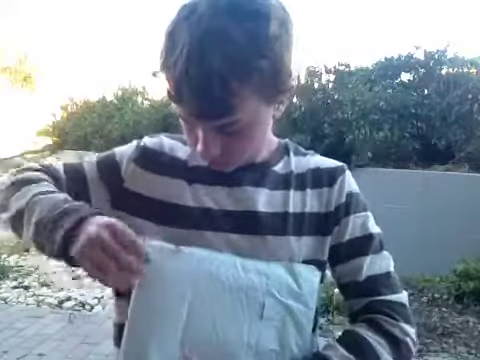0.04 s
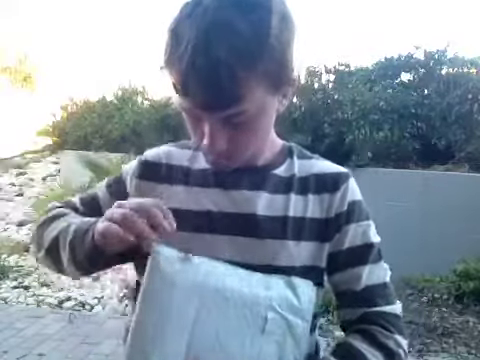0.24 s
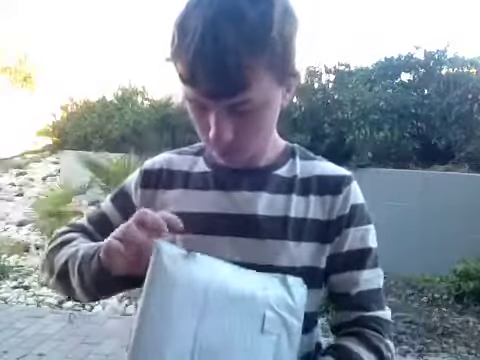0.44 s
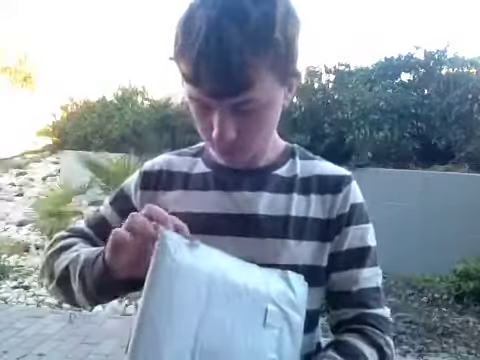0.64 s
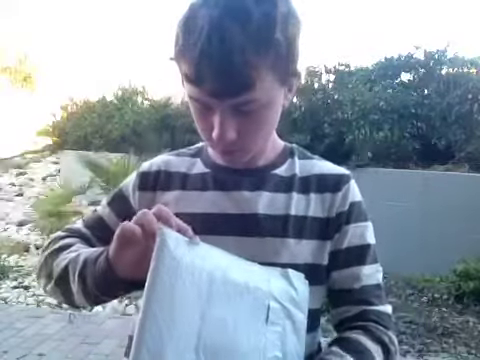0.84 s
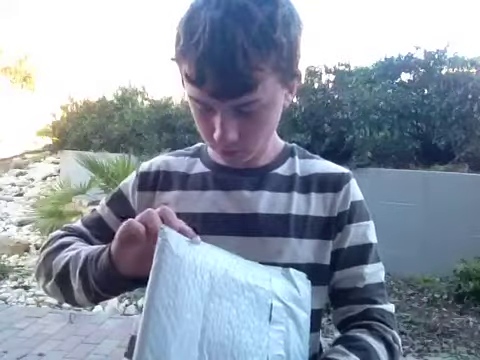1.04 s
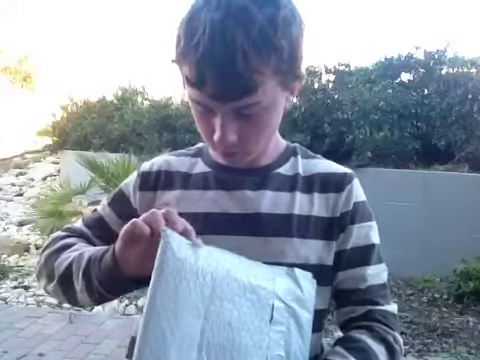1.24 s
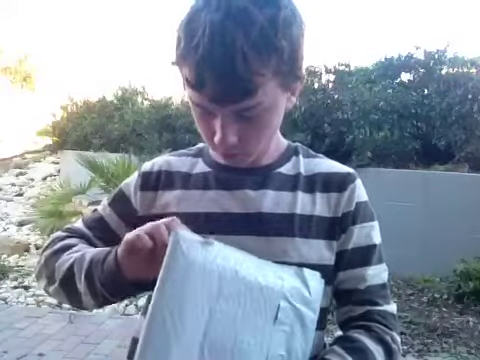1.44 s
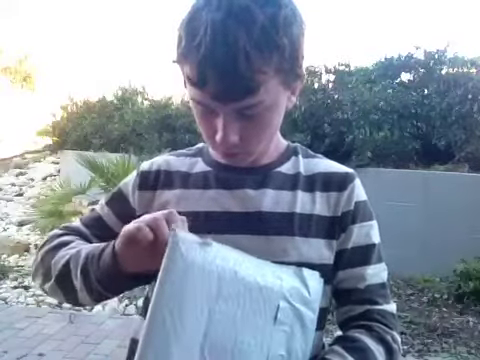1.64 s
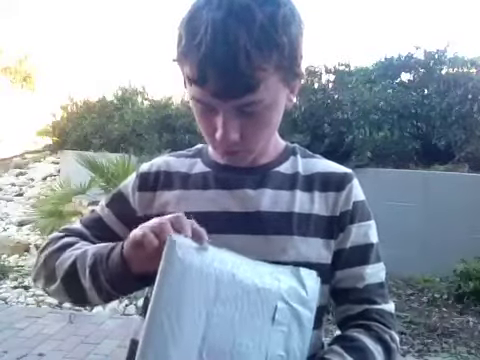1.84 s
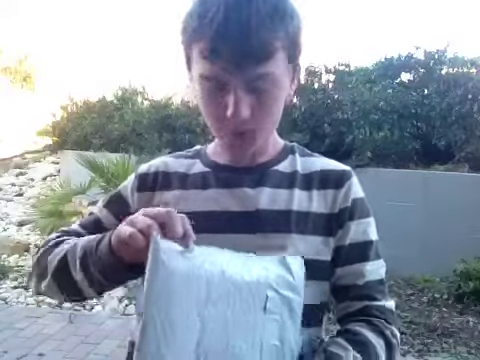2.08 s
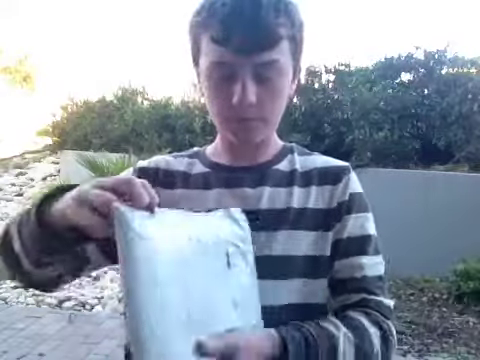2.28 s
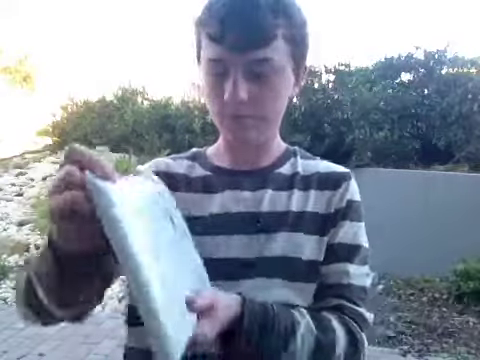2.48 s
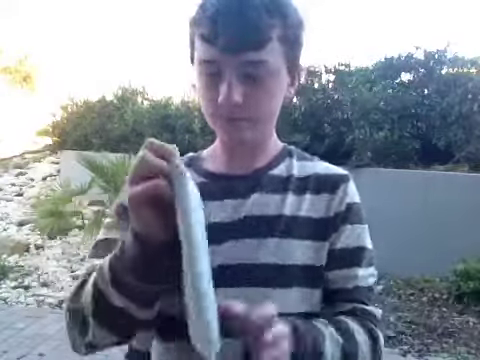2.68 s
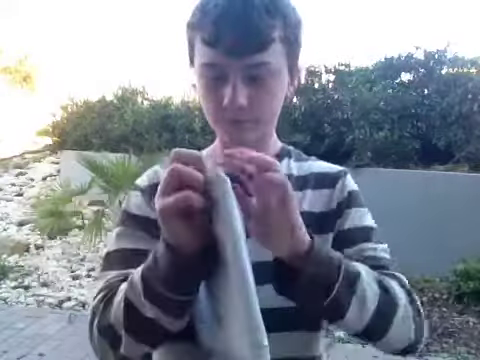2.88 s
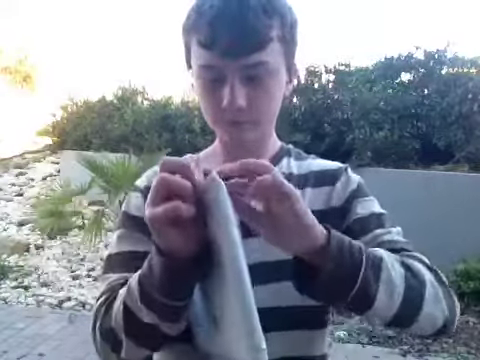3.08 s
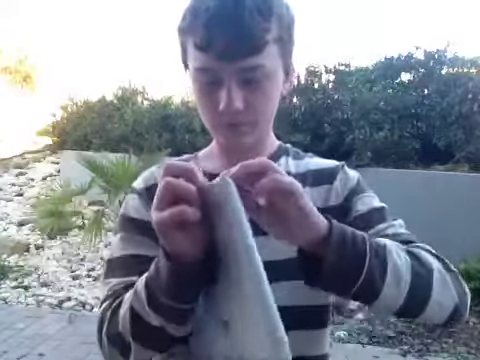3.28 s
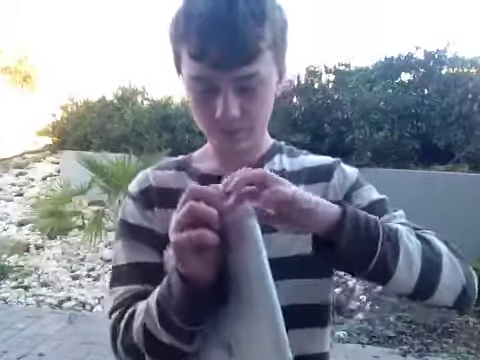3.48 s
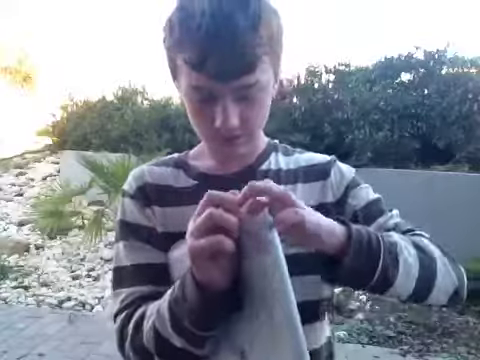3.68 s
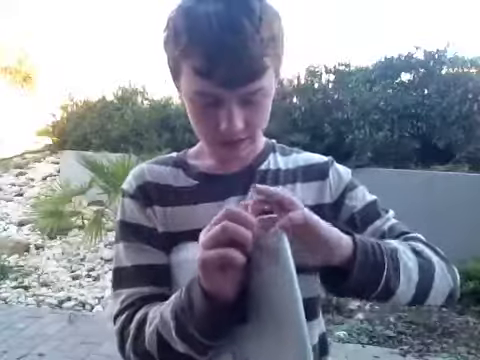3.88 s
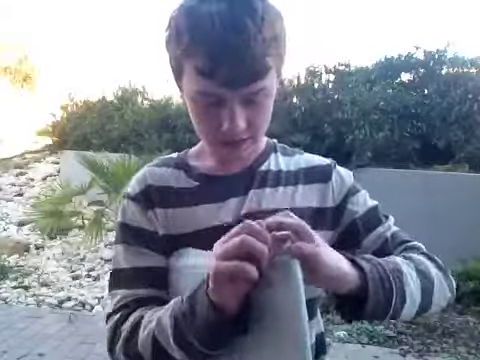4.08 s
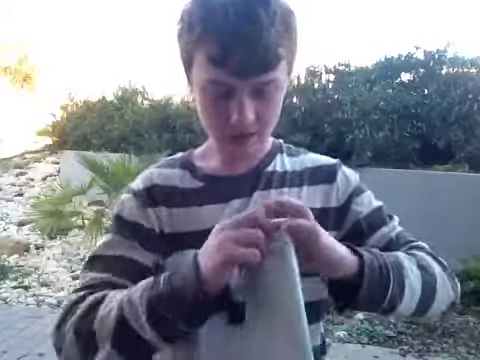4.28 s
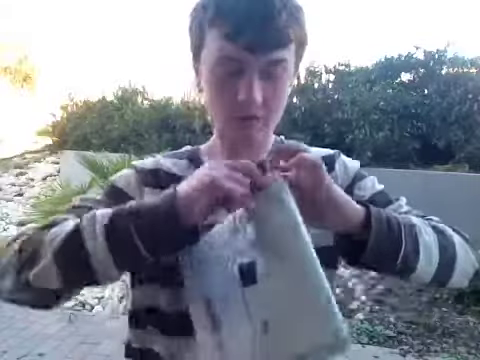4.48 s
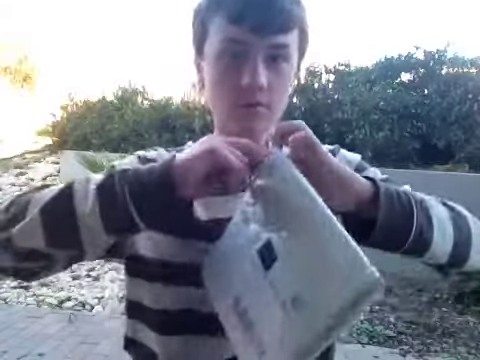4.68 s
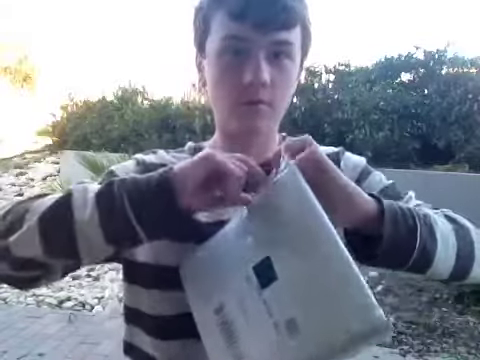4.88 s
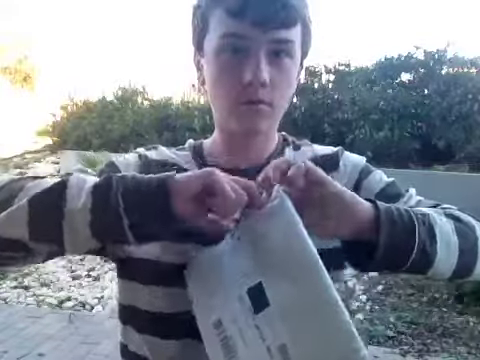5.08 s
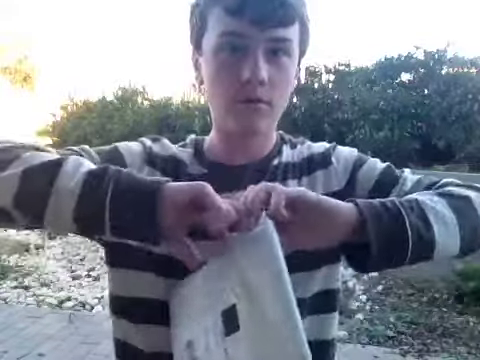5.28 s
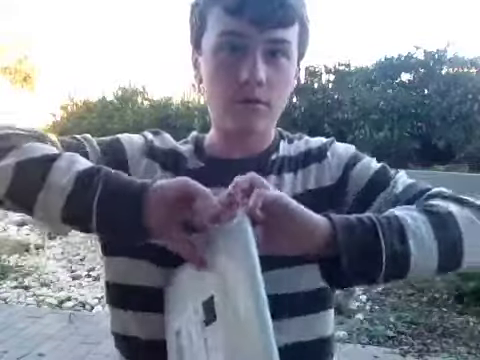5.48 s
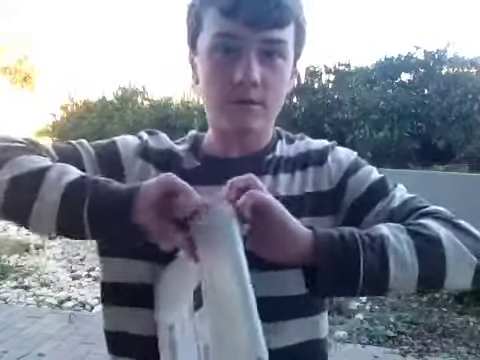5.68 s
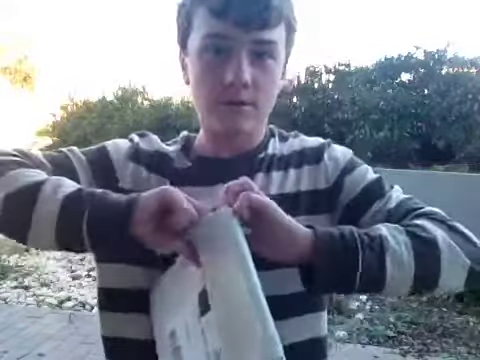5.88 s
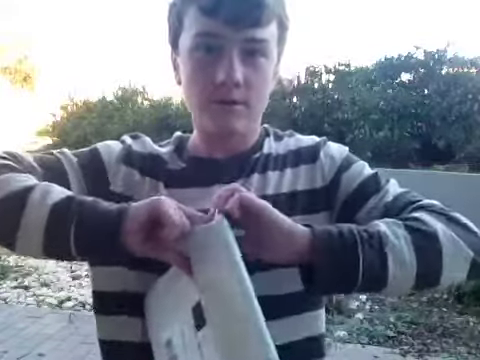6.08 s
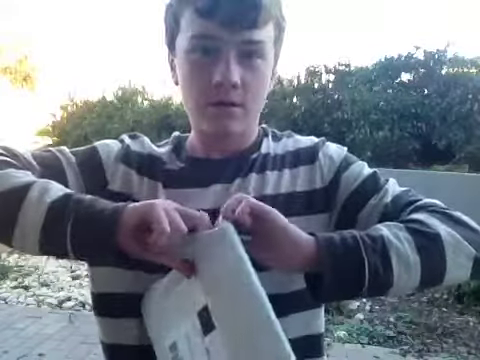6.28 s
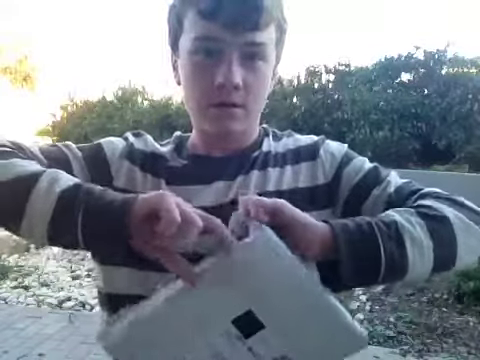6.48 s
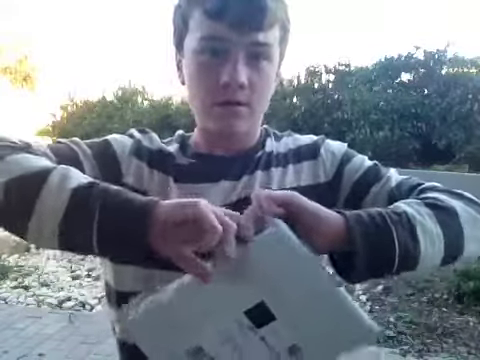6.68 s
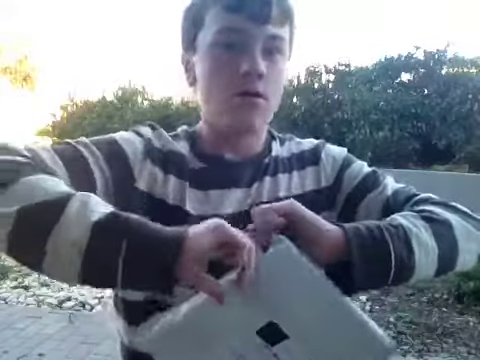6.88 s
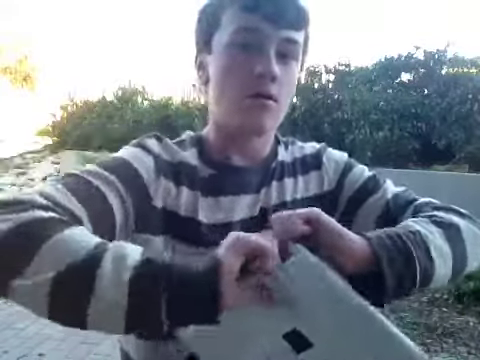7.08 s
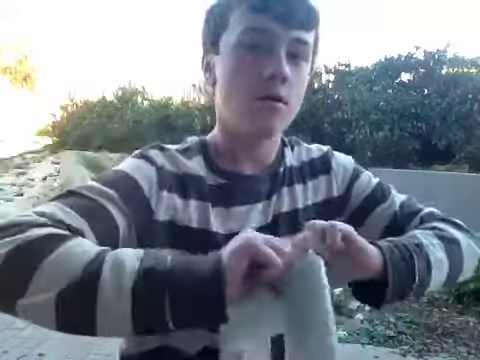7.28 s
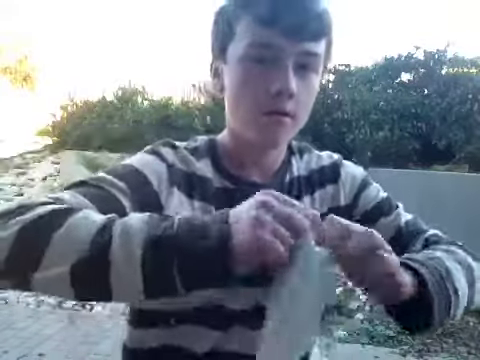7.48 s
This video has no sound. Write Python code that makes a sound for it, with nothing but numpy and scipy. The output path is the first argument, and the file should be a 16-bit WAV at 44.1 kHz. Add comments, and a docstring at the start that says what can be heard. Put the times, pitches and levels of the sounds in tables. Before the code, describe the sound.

Stiff padded envelope crackles and rips in short tugs, with a few sharp pops and dull thumps, in a quiet yard.

```python
"""Paper rustles, crackles and tears in short tugs, with hollow knocks, in a quiet yard with a faint hum and hiss.
Hands pick at a padded paper mailer, turn it over and tear its sealed edge open.
Slipping fibres and folding creases are clumped grains over coloured noise; sharp snaps are kicks with noise tails.
Damped modes sound the padded body, and short decaying noise answers from paving and a garden wall."""
import sys
import numpy as np
from scipy import signal
from scipy.fft import rfft, irfft, next_fast_len
from scipy.io import wavfile
from scipy.ndimage import map_coordinates

SR = 44100
rng = np.random.default_rng(int(sys.argv[2]) if len(sys.argv) > 2 else 0)


def store_wav(level_fs):
    """Save 16-bit WAV to argv[1]."""
    pcm = np.round(np.clip(np.atleast_2d(level_fs), -1, 1) * 32767)
    wavfile.write(sys.argv[1], SR, pcm.T.astype(np.int16))


N = 332514

# relative spectrum of the flexing sheet: frequency_hz, density_db
SHEET_SPECTRUM = [(80, -41), (250, -8.5), (400, -4.5), (800, -7), (1600, 0.5), (2700, 3.5), (4200, 5.5),
                  (7000, -42), (14000, -52)]


def amp(db):
    """Decibel law: amplitude ratio of a level in dB."""
    return 10 ** (np.asarray(db) / 20)


def unit(x):
    """Normalisation by mean power: x at rms 1."""
    return x / np.sqrt(np.mean(x ** 2) + 1e-20)


def along(points, hz):
    """Interpolation of (frequency_hz, value) points on a logarithmic frequency axis."""
    f, v = np.transpose(points)
    return np.interp(np.log(hz + 1), np.log(f + 1), v)


def wobble(rate):
    """Slow random modulation: a smooth curve through random knots, rate of them a second."""
    knots = rng.standard_normal(int(N * rate / SR) + 4)
    return map_coordinates(knots, [np.arange(N) * rate / SR])


def colour(x, spectrum, size=2048):
    """Minimum-phase filtering: folding the cepstrum gives a causal filter with this spectrum."""
    log_gain = np.log(amp(along(spectrum, np.fft.rfftfreq(size, 1 / SR))))
    cepstrum = irfft(log_gain)
    cepstrum[1:size // 2] *= 2
    cepstrum[size // 2 + 1:] = 0
    impulse = irfft(np.exp(rfft(cepstrum)))
    return signal.fftconvolve(x, impulse)[:len(x)]


def add(track, s, sound):
    """Superposition: mix a sound into the track at time s."""
    part = track[max(round(s * SR), 0):][:len(sound)]
    part += sound[:len(part)]


def ring(hz, cycles, t):
    """Damped free vibration: a kicked resonance that falls to 1/e in this many cycles."""
    return np.sin(2 * np.pi * hz * t) * np.exp(-hz * t / cycles)


def yard(air_db=-65.5, waver_db=3):
    """Stationary noise and tones: outdoor air and microphone hiss, with a wavering far hum."""
    # relative spectrum of the air and hiss: frequency_hz, density_db
    air_spectrum = [(25, -3), (55, -11), (85, -9.5), (120, 0), (185, -3), (260, -10), (600, -12),
                    (1400, -21), (3500, -23.5), (6300, -25.5), (8500, -46), (10800, -30.5), (15000, -25)]
    # distant machinery: frequency_hz, level_db (peak, before wavering)
    hum_tones = [(121, -71.5), (185, -78.5)]
    t = np.arange(N) / SR
    hum = np.zeros(N)
    for hz, db in hum_tones:
        level = amp(db + waver_db * wobble(7.8))
        hum += level * np.sin(2 * np.pi * hz * t + 1.24 * wobble(7.8))
    return amp(air_db) * unit(colour(rng.standard_normal(N), air_spectrum)) + hum


def echo(x, delay_s=.003, count=24):
    """Diffuse reflection: paving and wall return decaying noise, redrawn in stretches as the mailer moves."""
    # decay of the reflections: frequency_hz, t60_s
    wall_decay = [(200, 0.27), (1500, 0.17), (6000, 0.2), (14000, 0.19)]
    out = np.zeros(N)
    for part in np.array_split(np.arange(N), count):
        hz, t, z = signal.stft(rng.standard_normal(SR // 3), SR, nperseg=256)
        decay = amp(-60 * t / along(wall_decay, hz)[:, None])
        tail = signal.istft(z * decay, SR, nperseg=256)[1]
        add(out, part[0] / SR + delay_s, signal.fftconvolve(x[part], tail / np.linalg.norm(tail)))
    return out


def bump(s=2.103, db=-36, hz=183, t60_s=0.2, octave_db=-16):
    """Damped vibration with a sagging pitch: a soft, hollow bump as the mailer is lifted."""
    out, t = np.zeros(N), np.arange(SR // 3) / SR
    attack_s, sharp, settle_s = .016, .6, .009  # sharp: initial rise as a fraction of hz
    pitch_hz = hz * (1 + sharp * np.exp(-t / settle_s))
    phase = 2 * np.pi * np.cumsum(pitch_hz) / SR
    envelope = amp(db - 60 * t / t60_s) * (1 - np.exp(-t / attack_s))
    add(out, s, envelope * (np.sin(phase) + amp(octave_db) * np.sin(2 * phase)))
    return out


def body(t, attack_s=0.0011):
    """Modal superposition: one ring of the air-filled padding, its modes at new strengths each time."""
    # modes of the padded body: frequency_hz, relative_level_db, t60_s
    body_modes = [(208, -17, 0.033), (270, -7.5, 0.044), (362.5, 3.5, 0.053), (420, 4, 0.052),
                  (515, 9.5, 0.034), (608, -12, 0.019)]
    modes = np.zeros(len(t))
    for hz, db, t60_s in body_modes:
        modes += amp(db + rng.normal(0, 1) - 60 * t / t60_s) * np.sin(2 * np.pi * hz * t)
    return (1 - np.exp(-t / attack_s)) * modes


def fingers(drag_db, drag_t60_s=0.0078):
    """Impact and friction excitation: knocks ring the padded body; dragging fingers rub it and damp it."""
    # fingers knocking the padded body: start_s, level_db (10 dB above the gain on the modes)
    knocks = [(1.39, -47), (1.4, -25), (2.396, -48), (2.699, -40), (4.303, -46.5), (5.713, -41.5),
              (6.339, -47)]
    out, t = np.zeros(N), np.arange(SR // 4) / SR
    for s, db in knocks:
        add(out, s, amp(db - 10) * body(t))
    damped = body(t) * amp(-60 * t / drag_t60_s)
    friction = rng.standard_normal(N) * amp(2.4 * wobble(30))
    rubbing = signal.fftconvolve(friction, damped)[:N]
    return out + amp(drag_db) * unit(rubbing)


def strokes(rows, attack_s=0.012, release_s=0.034):
    """Power addition of hand moves (start_s, length_s, level_db): each takes hold, holds and decays to 1/e."""
    power = np.zeros(N)
    for start, length, db in rows:
        t = np.arange(int(length * SR) + SR // 4) / SR
        shape = np.minimum(t / attack_s, 1) * np.exp(-np.maximum(t - length, 0) / release_s)
        # the listed start falls half way up the attack
        add(power, start - attack_s / 2, (amp(db) * shape) ** 2)
    return power


def effort(hold_gain_db=-1, hold_flex_db=-10, hold_drag_db=-24.5):
    """Incoherent addition: holding and strokes add in power to levels in dB of fibres, sheet and drag."""
    # light rubbing of the held paper: time_s, level_db (before hold_gain_db)
    hold = [(0.0, -59), (0.25, -60.5), (0.69, -70.5), (1.03, -66), (1.3, -52), (1.51, -66), (1.93, -67.5),
            (2.67, -39.5), (2.81, -54), (3.23, -57.5), (3.78, -52.5), (4.91, -55), (5.54, -49),
            (6.05, -53.5), (7.29, -47.5), (7.54, -43.5)]
    # picks, turns and tugs: start_s, length_s, fibre_level_db, flex_db (sheet relative to fibres)
    tugs = [(0.01, 0.046, -58.5, -6), (0.128, 0.067, -51, -10), (0.255, 0.13, -57, -5.5),
            (1.11, 0.19, -62.5, -15), (1.351, 0.069, -51, -13), (2.027, 0.19, -55.5, -4.5),
            (2.363, 0.14, -48, -8.5), (2.463, 0.17, -43, -18), (2.777, 0.041, -48, -11),
            (2.98, 0.035, -53.5, -12), (3.347, 0.19, -57, -9), (3.659, 0.06, -47.5, -11),
            (3.75, 0.095, -46.5, -10.5), (4.003, 0.046, -50, -10), (4.16, 0.14, -51, -7.5),
            (4.466, 0.13, -55.5, -6), (4.685, 0.071, -55, -6), (4.928, 0.045, -49.5, -6),
            (5.078, 0.18, -47.5, -7.5), (5.304, 0.03, -41.5, -6.5), (5.463, 0.14, -45, -19),
            (5.626, 0.097, -44, -6), (5.708, 0.04, -39.5, -10), (5.954, 0.17, -51.5, -4),
            (6.406, 0.12, -46.5, -6.5), (6.51, 0.13, -46, -7), (6.704, 0.16, -49.5, -8),
            (7.029, 0.083, -45.5, -8.5), (7.152, 0.12, -40.5, -8.5), (7.485, 0.039, -43.5, -6)]
    # fingers dragging on the padding: start_s, length_s, level_db
    drags = [(0.14, 0.19, -74), (2.39, 0.15, -71), (2.55, 0.17, -61), (3.39, 0.089, -68),
             (3.76, 0.056, -63), (6.8, 0.38, -72.5), (7.15, 0.39, -67)]
    hold_s, hold_db = np.transpose(hold)
    held = amp(np.interp(np.arange(N) / SR, hold_s, hold_db) + hold_gain_db)
    crisp = held ** 2 + strokes([(s, length, db) for s, length, db, flex_db in tugs])
    flex_tugs = [(s, length, db + flex_db) for s, length, db, flex_db in tugs]
    flex = (held * amp(hold_flex_db)) ** 2 + strokes(flex_tugs)
    drag = (held * amp(hold_drag_db)) ** 2 + strokes(drags)
    return 10 * np.log10([crisp, flex, drag])


def crackle(rate, pitch_hz, pitch_spread, cycles, spread_db, clump_db, size=256):
    """Stick-slip as shot noise: clumped slips of very unequal size ring facets of their own pitch. Rms 1."""
    at = np.flatnonzero(rng.random(N) < rate / SR)
    hz = np.clip(pitch_hz * np.exp(pitch_spread * rng.standard_normal((len(at), 1))), 250, 14000)
    strength = np.minimum(rng.exponential(size=len(at)), 3)
    gain = rng.choice([-1, 1], len(at)) * amp(spread_db * strength + clump_db * wobble(70)[at])
    grains = gain[:, None] * np.sqrt(hz) * ring(hz, cycles, np.arange(size) / SR)
    positions = at[:, None] + np.arange(size)
    return unit(np.bincount(positions.ravel(), grains.ravel())[:N])


def rustle(crisp_db, flex_db, fibre_hiss=0.91, sheet_hiss=1.0, catch_db=1.88, merging=0.04):
    """Friction noise: fibres crackle high, the sheet crumples lower over hiss; both surge as paper catches."""
    # relative spectrum of rubbing paper: frequency_hz, density_db
    rub_spectrum = [(200, -64.5), (1500, -16), (3000, -13.5), (4700, -10), (5700, -3.5), (6400, 0),
                    (7500, -4), (9000, -9.5), (11000, -21), (15000, -25)]
    slips = crackle(rate=950, pitch_hz=6300, pitch_spread=0.46, cycles=0.71, spread_db=2.5, clump_db=2)
    folds = crackle(rate=520, pitch_hz=1985, pitch_spread=0.722, cycles=1.9, spread_db=4.0, clump_db=1.0)
    # the harder the rubbing, the more the slips merge into hiss
    hiss = amp(merging * (crisp_db - np.mean(crisp_db))) * rng.standard_normal((2, N))
    fibres = unit(colour(slips + fibre_hiss * hiss[0], rub_spectrum))
    sheet = unit(colour(folds + 0.6 * slips + sheet_hiss * hiss[1], SHEET_SPECTRUM))
    catches = amp(catch_db * wobble(45))
    return catches * (amp(crisp_db - 1.4) * fibres + amp(flex_db - 3.5) * sheet)


def buckles(give_t60_s=0.015, cycles=0.71):
    """Buckling instability: a slack panel pops through in a short dull shudder that rings its own pitch."""
    # panels popping through: start_s, level_db (19.5 dB above the rms of the pop), pitch_hz
    panels = [(1.401, -33, 1160), (2.491, -38, 850), (4.222, -32, 1320), (4.303, -43.5, 1200),
              (4.492, -28, 1800), (4.733, -40, 1800), (4.802, -37.5, 1680), (5.713, -24, 1110),
              (6.018, -43, 1270), (6.085, -40, 1750)]
    out, t = np.zeros(N), np.arange(SR // 20) / SR
    for s, db, hz in panels:
        shudder = colour(rng.standard_normal(len(t)) * amp(-60 * t / give_t60_s), SHEET_SPECTRUM)
        pop = signal.fftconvolve(shudder, ring(hz, cycles, t))[:len(t)]
        add(out, s, amp(db - 19.5) * unit(pop))
    return out


def small_snaps(crisp_db, per_s=11, mean_db=-36.5, follow=0.74, scatter_db=3, flex_db=-24, flex_scatter_db=9):
    """Random point process: snap rows at chance moments, louder (follow, dB per dB) as paper is worked harder."""
    count = int(per_s * N / SR)
    when, size, slack = rng.random((count, 3)).T
    at = (when * N).astype(int)
    db = mean_db + follow * (crisp_db[at] - np.mean(crisp_db)) + scatter_db * (2 * size - 1)
    sheet_db = flex_db + flex_scatter_db * (2 * slack - 1)
    return list(zip(at / SR, db, sheet_db))


def snaps(rows, scatter=0.32, scatter_t60_s=0.014, slack_t60_s=0.011, flex_db=12, facet_share=0.67,
          facet_cycles=2.03):
    """Impulsive release and multiple scattering: a sharp kick, then a rush of waves among the creases."""
    # relative spectrum of a fibre snapping: frequency_hz, density_db
    fibre_spectrum = [(200, -65), (1000, -42), (2500, -13), (4500, -5), (5500, 4.5), (6300, 6), (7200, 1),
                      (8700, -5.5), (10500, -20), (15000, -31)]
    # more flexing buckles a larger, lower facet: sheet_db (before flex_db), pitch_hz
    facet_pitch = [(-22.5, 4210), (-10.5, 1760)]
    out, t = np.zeros(N), np.arange(SR // 30) / SR
    lead_s = .0011  # each kick falls this long after its listed time
    decays = amp(-60 * t / [[scatter_t60_s], [slack_t60_s]])
    for s, db, sheet_db in rows:
        facet_hz = np.interp(sheet_db, *np.transpose(facet_pitch))
        crack, give = (t == 0) + scatter * rng.standard_normal((2, len(t))) * decays
        sheet = unit(colour(give, SHEET_SPECTRUM))
        # the flexing sheet rings the facet that buckled
        facet = unit(signal.fftconvolve(sheet, ring(facet_hz, facet_cycles, t))[:len(t)])
        flexing = amp(sheet_db + flex_db) * unit(sheet + facet_share * facet)
        sound = unit(colour(crack, fibre_spectrum)) + flexing
        add(out, s + lead_s, amp(db - 21.0) * unit(sound))
    return out


def scene(snap_gain_db=0.64, echo_hits_db=-9.5, echo_paper_db=-11):
    """Superposition of direct sound, reflections and background: the mailer, its echo and the yard."""
    # creases buckling and fibres parting: start_s, level_db (before snap gains), sheet_db (share of flexing)
    loud_snaps = [(0.129, -31, -24.5), (0.163, -26, -16.5), (0.276, -32, -17.5), (0.489, -40.5, -32),
                  (0.619, -44, -28), (0.352, -35, -18), (1.107, -31.5, -30), (1.158, -30, -30),
                  (1.216, -30.5, -42), (1.317, -40, -13), (1.388, -21.5, -18.5), (1.4, -15.5, -22.5),
                  (1.989, -36.5, -39), (2.158, -27.5, -21), (2.433, -24.5, -29), (2.519, -19, -42),
                  (2.575, -24.5, -24), (2.618, -22, -22.5), (2.743, -24, -39), (2.7625, -21, -38),
                  (2.779, -12.5, -22.5), (2.823, -24, -37), (2.976, -28, -49), (3.066, -31.5, -21.5),
                  (3.676, -27.5, -20.5), (3.762, -29.5, -14), (3.784, -25, -29), (3.867, -23.5, -24),
                  (4.177, -26.5, -21.5), (4.22, -26.5, -18), (4.258, -30.5, -15), (4.316, -29, -37),
                  (4.441, -33.5, -23.5), (4.576, -33, -27), (4.691, -27.5, -31), (4.798, -26, -23.5),
                  (4.856, -24, -51), (4.919, -28, -26), (5.057, -27.5, -14.5), (5.113, -22.5, -21.5),
                  (5.165, -27, -21), (5.215, -28, -18.5), (5.329, -25.5, -16.5), (5.344, -19.5, -42),
                  (5.421, -28, -17.5), (5.465, -26, -19.5), (5.578, -28.5, -13), (5.66, -28, -28),
                  (5.712, -10.5, -16), (5.721, -11.5, -19.5), (5.938, -27, -18), (5.965, -27.5, -32),
                  (6.308, -23, -22.5), (6.339, -25.5, -14.5), (6.536, -25.5, -19), (6.591, -25, -14.5),
                  (6.752, -28, -26), (6.834, -30.5, -17.5), (7.065, -32, -13), (7.173, -28.5, -24),
                  (7.197, -24.5, -20.5), (7.279, -24.5, -30)]
    crisp_db, flex_db, drag_db = effort()
    paper = rustle(crisp_db, flex_db) + bump()
    all_snaps = snaps(loud_snaps + small_snaps(crisp_db))
    hits = fingers(drag_db) + buckles() + amp(snap_gain_db) * all_snaps
    # the yard answers the sharp sounds and the rustle at separate levels
    reflected = echo(amp(echo_hits_db) * hits + amp(echo_paper_db) * paper)
    return (hits + paper + reflected + yard())[None]


def record(dry, bass_hz=95, top_hz=15600):
    """Band limitation: a small microphone loses the deep bass and keeps nothing above top_hz."""
    thin = signal.sosfilt(signal.butter(3, bass_hz, "highpass", fs=SR, output="sos"), dry)
    size = next_fast_len(N + SR // 4)
    passband = np.fft.rfftfreq(size, 1 / SR) < top_hz
    return irfft(rfft(thin, size) * passband, size)[:, :N]


dry = scene()
out = record(dry)
store_wav(out)
```